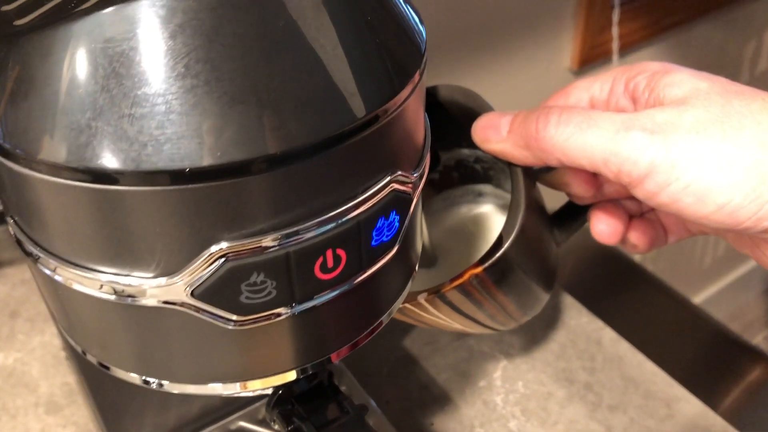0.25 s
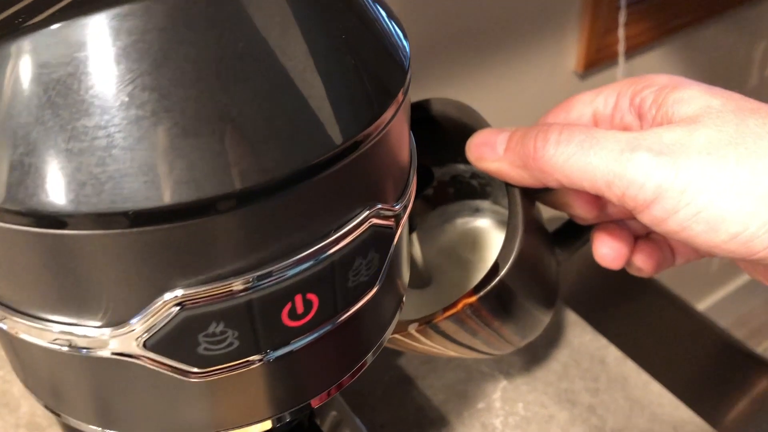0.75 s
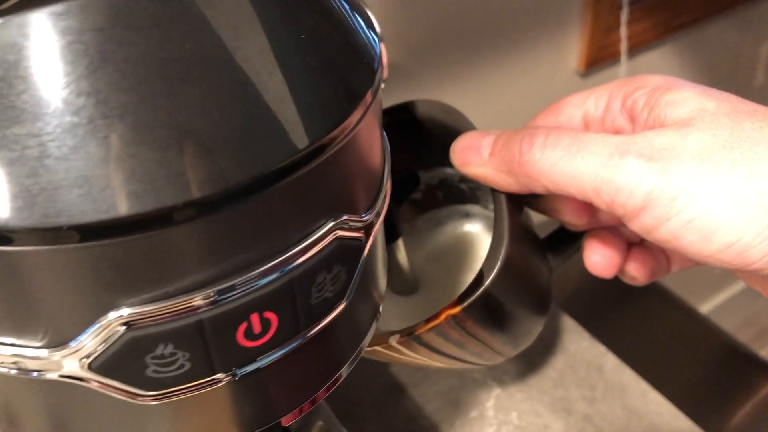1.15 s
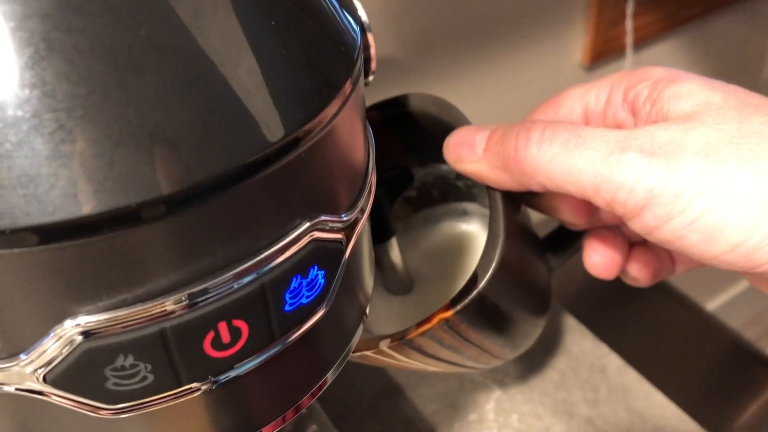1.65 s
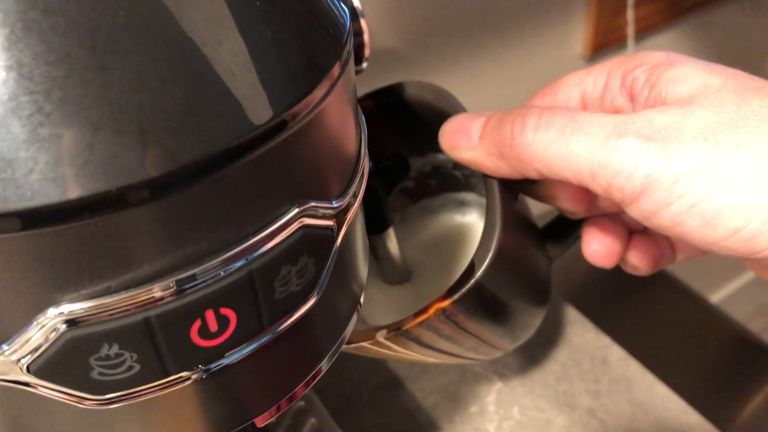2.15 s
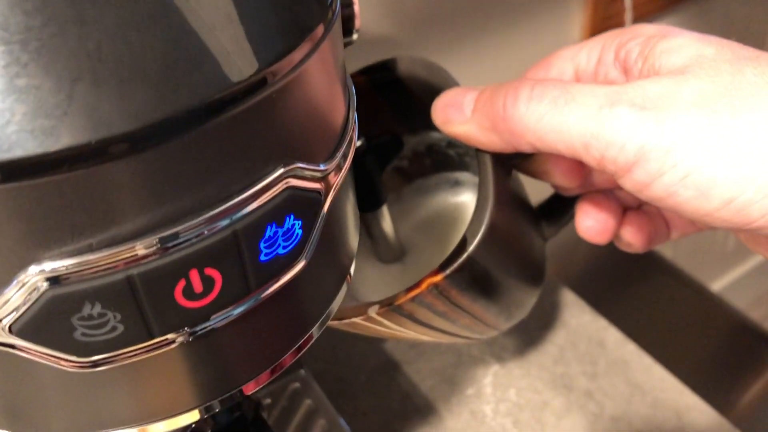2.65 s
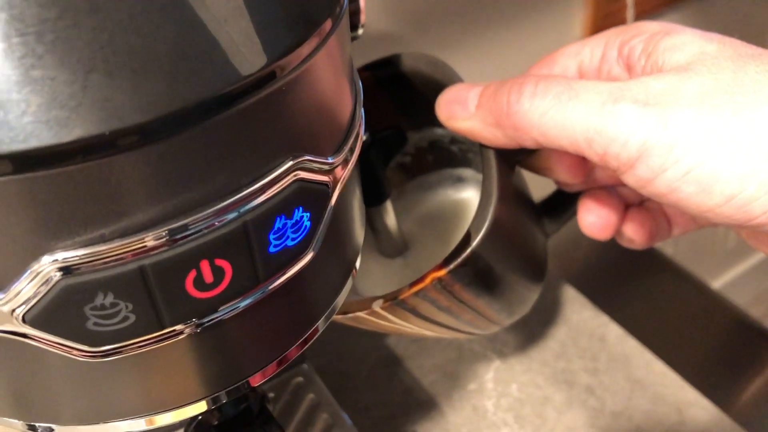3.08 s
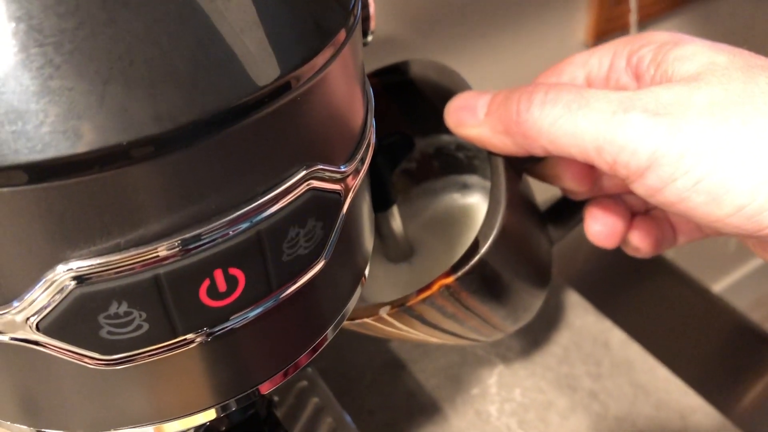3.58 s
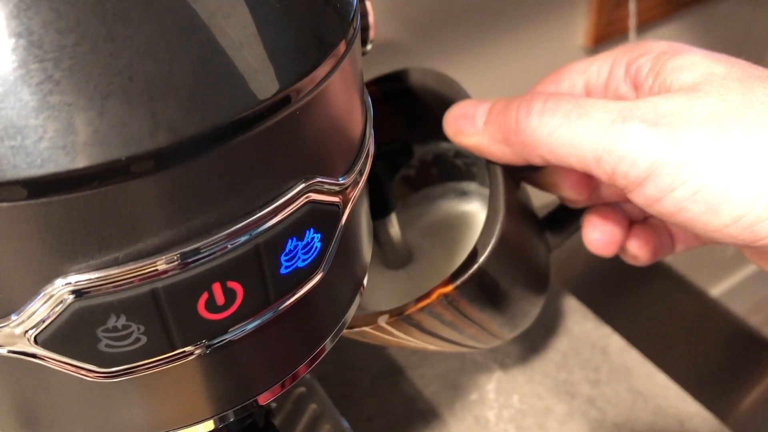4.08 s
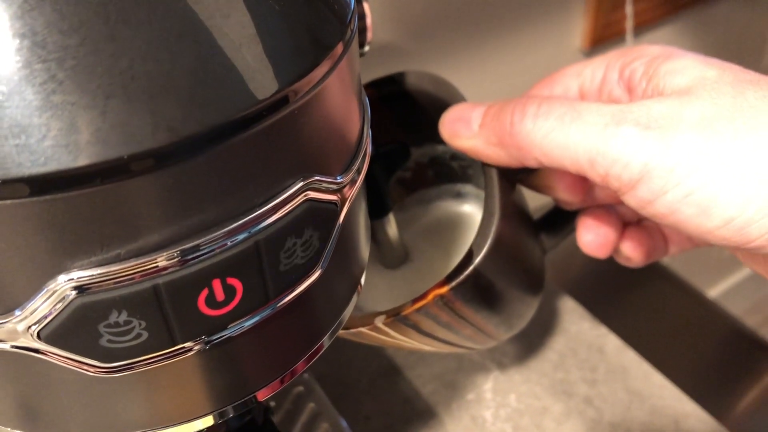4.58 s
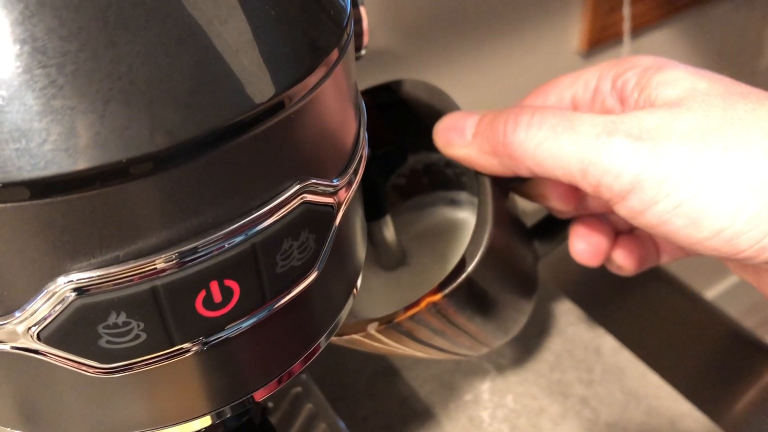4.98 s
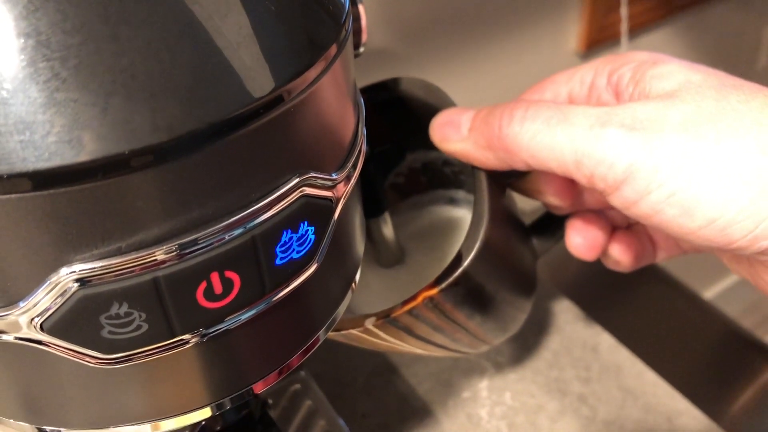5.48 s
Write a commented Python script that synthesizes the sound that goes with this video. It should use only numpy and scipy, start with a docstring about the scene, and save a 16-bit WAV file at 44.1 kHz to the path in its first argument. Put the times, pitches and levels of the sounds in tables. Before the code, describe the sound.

Close kitchen sound of milk being steamed in a steel pitcher: dry pops, a gush, pulsing hissy gurgles and finally a loud wavering squeal.

```python
"""Dry pops come first, as steam bubbles collapse in cold milk: a kitchen, one microphone close to the
steel pitcher under an espresso machine's steam wand. Then the jet gushes in, hissing, and churns the
milk in surges: a pocket of steam swells and bursts, the tip spits, the milk falls back with a burble.
At last the pocket locks into a loud squeal. Behind it all lie the boiler's murmur and the room's air."""
import sys
import numpy as np
from scipy import signal
from scipy.fft import rfft, irfft
from scipy.io import wavfile

SR = 44100
rng = np.random.default_rng(int(sys.argv[2]) if len(sys.argv) > 2 else 0)


def generate_wav(sig):
    """Save sig (samples, or channels by samples) to the path in sys.argv[1] as 16-bit PCM at SR."""
    pcm = np.round(np.clip(np.atleast_2d(sig).T, -1, 1) * 32767).astype(np.int16)
    wavfile.write(sys.argv[1], SR, pcm)


N = 252693
TIME = np.arange(N) / SR

# Levels in the tables are relative: each source adds its own gain and filtering.
# the steam pocket's surges: (crest time [s], pocket level [dB], upper resonance level [dB],
# pocket pitch at the crest [Hz], burble level [dB], wait to spit [s], spit run [s], spit level [dB])
SURGES = [(1.443, -49, -50, 930, -68, 0.055, 0.0, -48), (1.526, -34, -31.5, 900, -59, 0.048, 0.02, -52),
          (1.61, -33, -33.5, 920, -72, 0.063, 0.022, -44), (1.702, -47, -33, 1010, -60, 0.04, 0.049, -51),
          (1.815, -48, -37.5, 990, -53.5, 0.039, 0.0, -47), (1.93, -37, -29, 940, -53, 0.041, 0.0, -44),
          (2.019, -33.5, -28, 920, -47, 0.039, 0.039, -55),
          (2.157, -33.5, -39.5, 990, -50, 0.037, 0.0, -43),
          (2.267, -33, -32, 950, -46.5, 0.028, 0.021, -44),
          (2.403, -34.5, -36, 930, -54, 0.041, 0.057, -51), (2.519, -56, -37, 890, -51, 0.01, 0.033, -53),
          (2.613, -30.5, -28.5, 940, -50, 0.028, 0.041, -43.5),
          (2.74, -30.5, -29.5, 900, -49, 0.034, 0.04, -47),
          (2.876, -33.5, -26.5, 1030, -47, 0.035, 0.042, -45),
          (3.012, -34, -28, 920, -49, 0.028, 0.036, -51), (3.119, -33, -37, 940, -47, 0.037, 0.052, -51),
          (3.239, -31, -29, 1010, -47.5, 0.023, 0.067, -49),
          (3.412, -27.5, -30.5, 1000, -46, 0.045, 0.036, -48),
          (3.564, -25.5, -32, 1020, -49.5, 0.062, 0.0, -45),
          (3.668, -31, -28, 1040, -42.5, 0.0082, 0.032, -46),
          (3.761, -25.5, -38, 950, -41.5, 0.018, 0.075, -62),
          (3.899, -31, -37, 880, -50, 0.031, 0.037, -53),
          (4.024, -30.5, -33, 1030, -43.5, 0.008, 0.024, -48),
          (4.174, -30, -26.5, 970, -50, 0.045, 0.023, -59),
          (4.295, -30.5, -25, 990, -58, 0.047, 0.045, -55),
          (4.418, -45, -51, 990, -46.5, 0.022, 0.024, -53), (4.574, -20, -52, 950, -59, 0.031, 0, -81),
          (4.681, -26.5, -38, 1080, -46, 0.015, 0, -42)]
# steady churning under the surges: (time [s], level [dB], upper resonance [Hz])
CHURN = [(1.15, -46, 2350), (1.47, -39, 2450), (1.8, -40, 2560), (2.45, -38.5, 2785), (3.0, -40, 2843),
         (3.55, -38.5, 2896), (4.25, -38.5, 2515), (4.501, -39.5, 2520), (4.8, -39.5, 2710)]
# the wash of churned milk, and the splash of a bursting pocket: (frequency [Hz], level [dB])
WASH_COLOUR = [(200, -33), (450, -14), (700, -7.5), (850, 7.5), (1180, -0.5), (1500, -19), (2100, -5),
               (2600, 0.5), (3200, -2.5), (3600, -7), (4000, -21), (7000, -73.5)]
SPLASH_COLOUR = [(900, -1), (1200, -1), (1800, 2), (2500, -8), (3400, -1), (4200, -21), (5600, -4),
                 (7000, -10), (9000, -17), (15000, -22)]
# the locked pocket's squeal: (time [s], level [dB], pitch [Hz])
SQUEAL = [(4.74, -27, 862.5), (4.81, -18.5, 851.7), (4.95, -16.5, 856), (5.07, -13, 882),
          (5.25, -14.5, 882), (5.385, -13, 908), (5.45, -13, 885), (5.5, -14.5, 904), (5.572, -13, 844),
          (5.73, -13.5, 853)]
# the squeal falters: (time [s], half length [s], depth [dB])
STALLS = [(4.781, 0.013, 27), (4.849, 0.009, 15), (4.962, 0.018, 13), (5.009, 0.0098, 14),
          (5.048, 0.0062, 18), (5.106, 0.0072, 26), (5.303, 0.0073, 4.5), (5.411, .014, 7),
          (5.475, 0.0027, 17), (5.554, .002, 12), (5.601, 0.003, 13), (5.652, 0.0039, 11.5),
          (5.713, 0.0055, 11.5)]
# its unsteadiness, least when fully locked: (time [s], level flutter [dB], pitch jitter [Hz])
FLUTTER = [(4.8, 2.4, 28), (5.15, .9, 17), (5.45, 1.3, 22), (5.6, 2.2, 38)]
# foam hiss whipped up by the squeal: (time [s], level [dB])
FOAM = [(4.78, -44), (4.95, -43), (5.07, -36.5), (5.35, -35), (5.5, -35), (5.73, -34)]
# that foam, and the turbulence around the squeal: (frequency [Hz], level [dB])
FOAM_COLOUR = [(1500, -40), (2100, -4), (2300, -6.5), (2600, 5), (2850, -2.5), (3250, 3.5), (3650, -11),
               (4000, -16.5), (4400, -11.5), (5000, -20), (7000, -15), (8400, -19), (9500, -27),
               (15800, -40)]
TURBULENCE_COLOUR = [(250, -46.5), (400, -25), (520, -15.5), (650, -6), (790, 5.5), (950, 9), (1100, 4.5),
                     (1250, -8.5), (1450, -4.5), (1620, -37.5), (2500, -50.5)]
# steam roaring deep in the milk, one table as the jet opens, one into the squeal: (time [s], level [dB])
RUSHES = [
    [(1.12, -55), (1.16, -27), (1.25, -30.5), (1.28, -25), (1.37, -27), (1.5, -33), (2.0, -46)],
    [(4.42, -37), (4.55, -28), (4.65, -22), (4.71, -29.5), (4.76, -22), (4.83, -25), (4.95, -31.5),
     (5.45, -30), (5.73, -42)],
]
# sliding gushes: (time [s], length [s], level [dB], first pitch [Hz], last pitch [Hz], sputter [dB])
GUSHES = [(0.659, 0.037, -48, 2970, 1320, -52), (0.853, 0.024, -42, 2190, 1330, -65),
          (0.88, 0.027, -51, 4300, 3800, -43.5), (1.022, 0.0074, -34, 4460, 3150, -60),
          (1.028, 0.027, -32, 1800, 990, -64), (1.154, 0.029, -52, 1830, 3090, -27.5),
          (1.193, 0.035, -47, 2300, 2500, -26.5), (1.237, 0.015, -29, 2350, 2400, -34.5),
          (1.268, 0.015, -21.5, 3040, 1780, -24), (1.281, 0.057, -21.5, 1770, 2070, -29.5),
          (1.33, 0.068, -21.5, 2100, 1860, -28), (1.396, 0.025, -26.5, 3100, 1320, -29.5),
          (1.442, 0.035, -29.5, 2600, 2040, -32.5), (4.732, 0.15, -28.5, 1780, 1500, -51.5)]
# milk stirred by the rush, and the sputter of a gush: (frequency [Hz], level [dB])
STIR_COLOUR = [(450, -29.5), (750, -12), (950, -2), (1200, 5), (1500, -2.5), (2200, 3), (2700, -9),
               (4000, -22), (8000, -35)]
SPUTTER_COLOUR = [(600, -31), (1150, 8), (1600, -9), (2600, 2.5), (3600, .5), (5500, -3.5),
                  (7500, -10), (13000, -27)]
# the largest bubbles: (time [s], length [s], level [dB], first pitch [Hz], last pitch [Hz])
LARGE_BUBBLES = [(1.157, 0.0057, -16.5, 1000, 1010), (1.178, 0.0052, -16.5, 986, 1040),
                 (1.241, 0.013, -13.5, 1250, 1020), (1.414, 0.016, -22.5, 1050, 950),
                 (1.444, 0.031, -26, 909, 862), (1.514, 0.026, -25.5, 877, 899),
                 (2.262, 0.015, -25, 2780, 2710), (2.395, 0.023, -29, 924, 855),
                 (2.428, 0.015, -17.5, 2875, 2650), (2.594, 0.024, -23, 890, 940),
                 (2.606, 0.048, -30, 2815, 2810), (2.732, 0.032, -27.5, 886, 937),
                 (2.866, 0.023, -18.5, 2935, 2970), (2.874, 0.046, -35, 1104, 1240),
                 (3.016, 0.028, -28.5, 2930, 2795), (3.22, 0.03, -33, 876, 1100),
                 (3.4, 0.053, -32, 1012, 1124), (3.856, 0.055, -34, 945, 870),
                 (4.156, 0.023, -28, 1034, 874)]
# steam bubbles collapsing in cold milk: (time [s], crack level [dB], cavity ring level [dB])
POPS = [(0.0762, -28, -55), (0.108, -29.5, -46), (0.175, -31, -58), (0.2818, -32, -56), (0.3546, -34, -58),
        (0.415, -32, -39), (0.4758, -29, -40), (0.575, -30, -50), (0.757, -34.5, -58), (0.8001, -32, -51),
        (0.9585, -41, -36), (1.0226, -27, -28), (1.0615, -33, -25), (1.0874, -28, -29.5),
        (1.1109, -23.5, -31), (1.1254, -26, -59), (1.1386, -22, -26)]
# fine crackle between the pops: (time [s], level [dB])
CRACKLE = [(0, -53.5), (.16, -52), (.3, -42), (.53, -52.5), (.59, -41.5), (.69, -55.5), (.92, -41.5),
           (1.1, -45), (1.15, -51)]
# a pop, and the milk cavity it rings: (frequency [Hz], level [dB])
POP_COLOUR = [(900, -35), (1600, -16), (2100, -2), (3000, -1), (3700, 1), (4050, -7), (4500, -6),
              (5000, -9), (5600, -14), (7000, -16), (8400, -22), (10000, -30), (11300, -27), (15500, -37)]
CAVITY_COLOUR = [(300, -22), (700, -10), (830, 3.5), (940, 0), (1100, -11.5), (1500, -22), (4000, -41)]
# a spit's high fizz, and its spray of droplets: (frequency [Hz], level [dB])
FIZZ_COLOUR = [(11000, -23), (12800, -37), (13600, 0), (14050, 14), (14500, -2), (15200, 12), (15900, -41)]
SPRAY_COLOUR = [(1200, -40), (2400, -3), (4000, -7), (6100, 0), (7600, -3), (8400, 1), (9400, -6),
                (12500, -16), (16000, -35)]
# hiss of the steam jet: (time [s], level [dB])
JET = [(0.9, -73), (1.1, -73), (1.5, -40.5), (1.9, -42.5), (4.1, -43), (4.5, -45.5), (5.0, -51),
       (5.73, -43.5)]
# its spectrum: (frequency [Hz], level [dB])
JET_COLOUR = [(2500, -21), (3500, -14.5), (4000, -9.5), (4450, -1), (4900, -2), (6100, 0.5), (7000, 5.5),
              (7600, -6), (8400, 3), (9500, -15), (11300, -8.5), (12300, -12.5), (15800, -7)]
# resonances of the steel wand and pitcher: (frequency [Hz], width [Hz], gain [dB])
STEEL_MODES = [(470, 45, -9), (885, 60, -7), (1222, 30, -3), (1350, 28, -3), (1437, 35, -5), (2060, 35, 0),
               (2900, 80, -5), (4440, 150, -4), (5710, 90, -6), (6140, 100, -3), (7030, 150, 0),
               (11330, 240, 3), (12930, 120, 7)]
# dull bumps in the background: (time [s], length [s], level [dB], pitch [Hz])
BUMPS = [(0.96, .08, -52.5, 160), (4.043, .05, -52, 160)]
# kitchen air, and the boiler's murmur: (frequency [Hz], level [dB])
AIR_COLOUR = [(25, -10), (70, 0), (150, 0), (300, -2), (550, -6), (860, -5), (1400, -14), (2400, -8),
              (4000, -14), (8000, -29), (15000, -35)]
BOILER_COLOUR = [(25, -47), (70, -.5), (150, 7), (300, .5), (600, 3), (2000, -49)]


def churning(rest_hz=874.0, glide_s=.027, overshoot_s=.014, fall_s=.036):
    """The steam pocket swells, rises in pitch and bursts; the milk falls back with a burble."""
    gate, churn_db, upper_hz = curves(CHURN)
    pocket_power, burble_power, splash = np.zeros((3, N))
    upper_power = (gate * amp(churn_db)) ** 2
    pocket_hz = np.full(N, rest_hz)
    for s, pocket_db, upper_db, crest_hz, burble_db, *_ in SURGES:
        pocket_power += (amp(pocket_db) * crest(s, rise_s=.065, fall_s=fall_s)) ** 2
        upper_power += (amp(upper_db) * crest(s, rise_s=.03, fall_s=.04)) ** 2
        burble_power += (amp(burble_db) / (1 + ((TIME - s - .07) / .028) ** 4)) ** 2  # 70 ms later
        splash += amp((pocket_db + upper_db) / 2) * crest(s + .027, rise_s=.016, fall_s=.028)
        # the pitch keeps climbing a moment past the crest
        glide = np.exp(overshoot_s / glide_s) * crest(s + overshoot_s, glide_s, fall_s)
        pocket_hz += (crest_hz - rest_hz) * glide
        upper_hz += 61 * glide
    upper_hz += 90 * wander(25)
    throb = unit(amp(1.5 * wander(55)))
    pocket_ring = resonate(collapses(per_s=900, spread_db=1.5), pocket_hz, width_hz=140)
    upper_ring = resonate(swarm(per_s=1500, spread_db=1.5, top_hz=5000), upper_hz, width_hz=360)
    burble_ring = resonate(collapses(per_s=400, spread_db=2), hz=460, width_hz=170)
    pocket = amp(-6) * np.sqrt(pocket_power) * unit(pocket_ring + amp(-5) * ringing(pocket_hz))
    upper = amp(-4) * np.sqrt(upper_power) * unit(upper_ring + amp(-5) * ringing(upper_hz))
    burble = amp(2) * np.sqrt(burble_power) * burble_ring
    wash = gate * amp(churn_db - 3.5) * colour(swarm(per_s=1000, spread_db=2.3, top_hz=4930), WASH_COLOUR)
    splash *= amp(-13) * colour(noise(), SPLASH_COLOUR)
    return throb * (lull() * (pocket + upper + wash) + burble + splash)


def lull(depth_db=4, lag_s=.06, half_s=.022):
    """Gain of the churning: a short dip after each crest, while the milk falls back."""
    dips = sum(np.exp(-((TIME - s - lag_s) / half_s) ** 2) for s, *_ in SURGES)
    return amp(-depth_db * (dips - dips.mean()))


def ringing(hz, wobble=.022):
    """The pure, wobbling note of a bubble; rms 1."""
    wobbling_hz = hz * (1 + wobble * wander(88.4))
    return np.sqrt(2) * np.sin(2 * np.pi * np.cumsum(wobbling_hz) / SR)


def squealing(octave_db=-21.5):
    """The steam pocket oscillates by itself: an unsteady tone and its octave."""
    gate, level_db, hz = curves(SQUEAL)
    _, flutter_db, jitter_hz = curves(FLUTTER)
    stall_db = sum(depth * np.exp(-((TIME - s) / half) ** 2) for s, half, depth in STALLS)
    phase = 2 * np.pi * np.cumsum(hz + jitter_hz * wander(80)) / SR
    waver_db = flutter_db * wander(75)
    tone = np.sqrt(2) * (np.sin(phase) + amp(octave_db) * np.sin(2 * phase))
    return gate * amp(level_db + waver_db - stall_db) * tone


def rasping():
    """Turbulence around the squeal, and the dense hiss of milk that it whips to foam."""
    gate, level_db, _ = curves(SQUEAL)
    foam_gate, foam_db = curves(FOAM)
    turbulence = gate * amp(level_db - 9.5) * colour(noise(), TURBULENCE_COLOUR)
    foam = unit(swarm(per_s=12000, spread_db=2.5, top_hz=16000) + .6 * noise())
    return turbulence + foam_gate * amp(foam_db + 1.7 * wander(36)) * colour(foam, FOAM_COLOUR)


def rushing():
    """Submerged steam roars in a wide resonance and stirs the milk; each gush squelches and sputters."""
    level = sum(gate * amp(level_db) for gate, level_db in map(curves, RUSHES))
    roar = amp(-8) * resonate(collapses(per_s=2000, spread_db=9.7), hz=1740, width_hz=310)
    stir = amp(-12) * colour(collapses(per_s=2300, spread_db=2.4), STIR_COLOUR)
    squelch, sputter = np.zeros((2, N))
    slide = []
    for s, length, db, first_hz, last_hz, sputter_db in GUSHES:
        shape = swell(s, length)
        squelch += amp(db - 3) * shape
        sputter += amp(sputter_db - 6.5) * shape
        slide += [(s, first_hz), (s + length, last_hz)]
    _, slide_hz = curves(slide)
    sputter *= colour(swarm(per_s=3800, spread_db=2.9, top_hz=13980, size=220), SPUTTER_COLOUR)
    squelch *= resonate(noise(), slide_hz, width_hz=600)
    return level * (roar + stir) + squelch + sputter


def bubbling():
    """Each bubble, large or small, rings for some cycles, gliding and wobbling."""
    out, wobble = np.zeros(N), .018 * wander(90)
    for s, length, db, first_hz, last_hz in LARGE_BUBBLES + small_bubbles():
        age = np.linspace(0, 1, int(length * SR))
        hz = (first_hz + (last_hz - first_hz) * age) * (1 + wobble[int(s * SR):][:len(age)])
        add(out, s, amp(db - 2) * np.sin(np.pi * age) * np.sin(2 * np.pi * np.cumsum(hz) / SR))
    return out


def small_bubbles(per_s=40, length_s=.014, low_hz=1096, high_hz=2680, glide=.14):
    """Bubbles shed at random while the milk churns, in rows like the large ones."""
    times, churn_db, _ = np.transpose(CHURN)
    rows, span_s = [], np.ptp(times)
    for when, pitch, strength, slide in rng.random((400, 4))[:int(per_s * span_s)]:
        s = times[0] + when * span_s
        hz = low_hz * (high_hz / low_hz) ** pitch
        db = np.interp(s, times, churn_db) - 6.5 + 9 * strength
        rows.append((s, length_s, db, hz, hz * (1 + glide * (2 * slide - 1))))
    return rows


def popping(simmer_db=-55):
    """Collapsing steam bubbles rattle around the pitcher and nudge the simmering milk cavity."""
    cracks, rings = np.zeros((2, N))
    for s, db, ring_db in POPS:
        add(cracks, s, amp(db - 4) * burst(rise_s=.0009, decay_s=.002))
        add(rings, s, amp(ring_db) * burst(rise_s=.00069, decay_s=.0035))
    gate, level_db = curves(CRACKLE)
    clicks = collapses(per_s=900, spread_db=5)
    ticks = signal.oaconvolve(clicks, burst(rise_s=.0001, decay_s=.0018))[:N]
    crackle = gate * amp(level_db) * unit(ticks)
    simmer = gate * amp(simmer_db) * noise()
    cavity = colour(rings + amp(-10.5) * crackle + simmer, CAVITY_COLOUR)
    return colour(cracks + crackle, POP_COLOUR) + cavity


def spitting(gap_s=.021, half_s=.003, jitter_s=.0015):
    """After each surge the tip meets the air and spits steam and droplets, once or in a quick run."""
    t = np.arange(-1024, 1024) / SR
    puff = np.exp(-(t / half_s) ** 2) + .1 * np.exp(-abs(t) / .009)
    fizz, spray = np.zeros((2, N))
    mean_db = np.mean([db for *_, db in SURGES])
    chances = rng.standard_normal((len(SURGES), 10, 2))
    for (s, *_, wait, length, db), chance in zip(SURGES, chances):
        run = np.linspace(0, length, 1 + round(length / gap_s))
        spray_db = -40.5 + .33 * (db - mean_db)  # droplets follow a spit's strength only in part
        for offset, (late, scatter_db) in zip(run, chance):
            start = s + wait + offset + jitter_s * late + t[0]
            add(fizz, start, amp(db + scatter_db) * puff)
            add(spray, start, amp(spray_db + scatter_db) * puff)
    droplets = swarm(per_s=7000, spread_db=2, top_hz=16000, size=160)
    return colour(fizz * droplets, FIZZ_COLOUR) + colour(spray * droplets, SPRAY_COLOUR)


def jet():
    """The nozzle's hiss, broken up by fine foam."""
    gate, level_db = curves(JET)
    flicker_db = 2.3 * wander(70)
    hiss = unit(swarm(per_s=6000, spread_db=3, top_hz=16000) + .7 * noise())
    return gate * amp(level_db - 7 + flicker_db) * colour(hiss, JET_COLOUR)


def steel(x):
    """Wand and pitcher add their narrow resonances to what stirs in them."""
    return x + sum(amp(db) * signal.lfilter(*signal.iirpeak(hz, hz / width, SR), x)
                   for hz, width, db in STEEL_MODES)


def reflections(x, t60_s, wet_db, per_s=2000, size=16384):
    """The direct sound and, from 3 ms behind it, a short wash off the machine, counter and wall."""
    t = np.arange(size) / SR
    echoes = rng.standard_normal(size) * (rng.random(size) < per_s / SR)
    taps = echoes * (t > .003) * amp(-60 * t / t60_s)
    return x + amp(wet_db) * signal.oaconvolve(x, taps / np.linalg.norm(taps))[:N]


def room_tone(air_db=-62):
    """Steady kitchen air, the boiler's low murmur and two dull bumps."""
    out = amp(air_db) * colour(noise(), AIR_COLOUR)
    boiler_db = np.interp(TIME, [.5, 1.2], [-70, -63])
    out += amp(boiler_db) * colour(noise(), BOILER_COLOUR)
    for s, length, db, hz in BUMPS:
        shape = np.exp(-(2 * (TIME - s) / length - 1) ** 2)
        out += amp(db) * shape * resonate(noise(), hz, width_hz=62)
    return out


def swarm(per_s, spread_db, top_hz, size=256):
    """Countless little bubbles of any pitch up to top_hz, each a ping of a few milliseconds; rms 1."""
    when, pitch, bulk, phase = rng.random((int(per_s * N / SR), 4)).T[:, :, None]
    k = np.arange(size)
    gain = amp(spread_db * np.minimum(-np.log(1 - bulk), 3))
    shape = (1 - np.exp(-16 * k / size)) * (1 - k / size) ** 2
    pings = gain * shape * np.sin(2 * np.pi * (pitch * top_hz * k / SR + phase))
    positions = (when * N).astype(int) + k
    return unit(np.bincount(positions.ravel(), pings.ravel(), N)[:N])


def collapses(per_s, spread_db):
    """Random clicks of uneven size; rms 1."""
    sizes = amp(spread_db * np.minimum(rng.exponential(1, N), 3.5))
    return unit(sizes * rng.choice([-1, 1], N) * (rng.random(N) < per_s / SR))


def burst(rise_s, decay_s, size=4096):
    """A puff of noise whose envelope peaks at 1."""
    t = np.arange(size) / SR
    shape = (1 - np.exp(-t / rise_s)) ** 2 * np.exp(-t / decay_s)
    return shape / shape.max() * rng.standard_normal(size)


def resonate(x, hz, width_hz):
    """A steep resonance that can follow a pitch curve, with little bass below it; rms 1."""
    carrier = np.exp(2j * np.pi * np.cumsum(hz * np.ones(N)) / SR)
    pole = np.exp(-np.pi * width_hz / SR)
    baseband = signal.lfilter([1], [1, -2 * pole, pole * pole], np.gradient(x) / carrier)
    return unit((carrier * baseband).real)


def colour(x, points, size=4096):
    """Causal filter of unit energy with a given spectrum."""
    hz, db = np.transpose(points)
    bin_hz = abs(np.fft.fftfreq(size, 1 / SR)) + 1
    log_gain = np.log(amp(np.interp(np.log(bin_hz), np.log(hz), db)))
    taps = np.fft.ifft(np.exp(signal.hilbert(log_gain).conj())).real[:size // 2]  # minimum phase
    return signal.oaconvolve(x, taps / np.linalg.norm(taps))[:N]


def crest(s, rise_s, fall_s):
    """Grows exponentially to 1 at time s, then collapses."""
    out = np.zeros(N)
    near = slice(max(int(s * SR) - SR // 2, 0), int(s * SR) + SR // 2)
    t = TIME[near] - s
    out[near] = np.exp(np.minimum(t, 0) / rise_s - (np.maximum(t, 0) / fall_s) ** 2)
    return out


def swell(s, length_s):
    """A rounded rise and fall that starts at s."""
    return np.sqrt(np.maximum(1 - (2 * (TIME - s) / length_s - 1) ** 2, 0))


def curves(rows, fade_s=.03):
    """A gate for the span of a table, then each column after the time at sample rate."""
    s, *columns = np.transpose(rows)
    gate = np.interp(TIME, [s[0] - fade_s, s[0], s[-1], s[-1] + fade_s], [0, 1, 1, 0])
    return [gate] + [np.interp(TIME, s, column) for column in columns]


def wander(hz):
    """Smooth random drift of rms 1, rolling off above hz."""
    lowpass = np.exp(-(np.fft.rfftfreq(N, 1 / SR) / hz) ** 2)
    return unit(irfft(rfft(noise()) * lowpass, N))


def add(mix, s, sound):
    """Mixes a sound in at time s."""
    part = mix[max(round(s * SR), 0):][:len(sound)]
    part += sound[:len(part)]


def noise():
    """White noise for the whole scene."""
    return rng.standard_normal(N)


def unit(x):
    """Scales to rms 1."""
    return x / np.sqrt(np.mean(x ** 2) + 1e-20)


def amp(db):
    """Decibels to gain."""
    return 10 ** (np.asarray(db) / 20)


def scene():
    """The pitcher close up, the kitchen behind it, in mono; the sounds from the pitcher carry little bass below
    about 280 Hz."""
    milk = amp(-4) * popping() + jet() + churning() + rushing() + spitting() + bubbling() + rasping()
    pitcher = signal.sosfilt(signal.butter(3, 280, "highpass", fs=SR, output="sos"), steel(milk))
    pitcher = reflections(pitcher, t60_s=.1, wet_db=-10)
    squeal = reflections(squealing(), t60_s=.18, wet_db=-34)
    return (pitcher + squeal + room_tone())[None]


def record(dry, low_cut_hz=50, top_hz=15800, fade_s=.004):
    """The microphone feeds a recorder with a bass roll-off and band limit; a very short fade ends it."""
    thinned = signal.sosfilt(signal.butter(2, low_cut_hz, "highpass", fs=SR, output="sos"), dry)
    faded = thinned * np.clip((TIME[-1] - TIME) / fade_s, 0, 1)
    band_limit = signal.firwin(511, top_hz, window=("kaiser", 9), fs=SR)
    return signal.oaconvolve(faded, band_limit[None], "same")


dry = scene()
out = record(dry)
generate_wav(out)
```